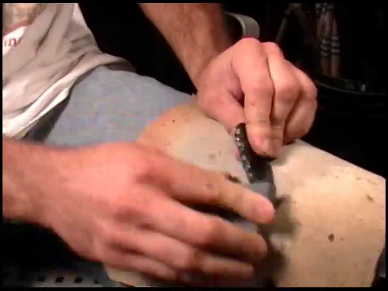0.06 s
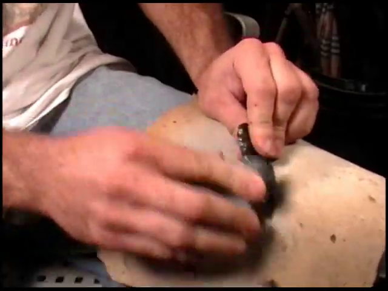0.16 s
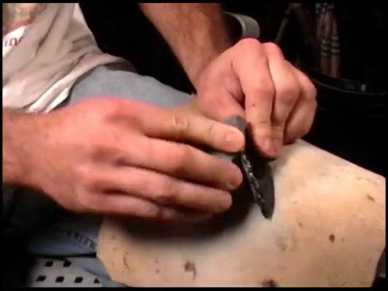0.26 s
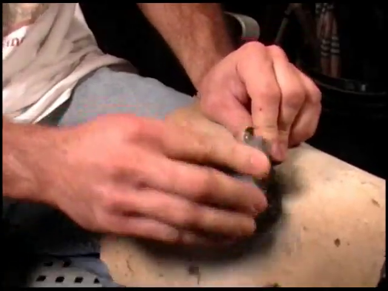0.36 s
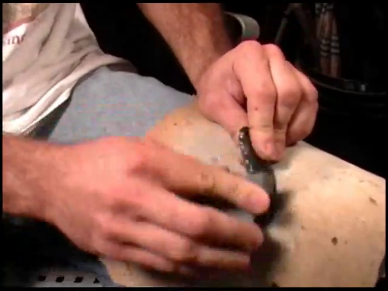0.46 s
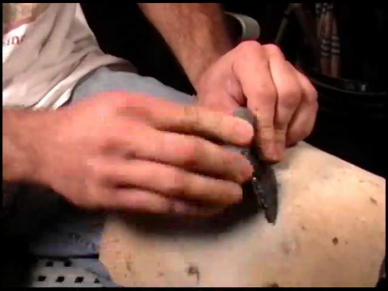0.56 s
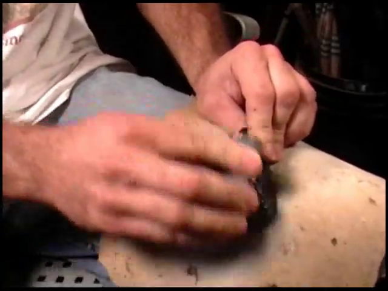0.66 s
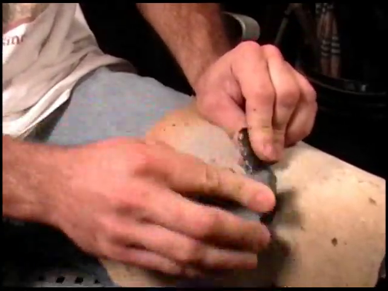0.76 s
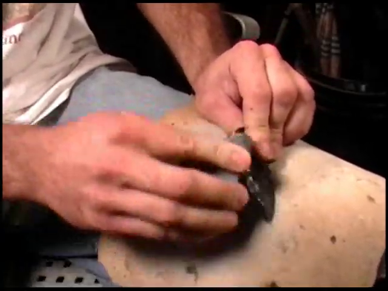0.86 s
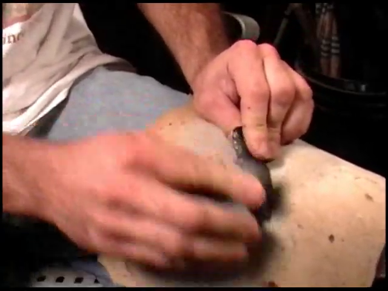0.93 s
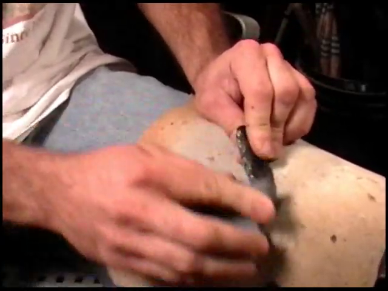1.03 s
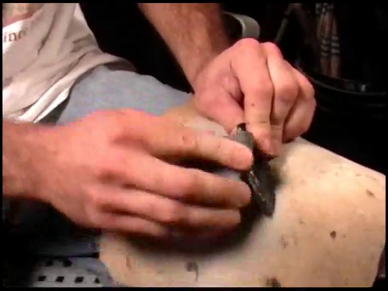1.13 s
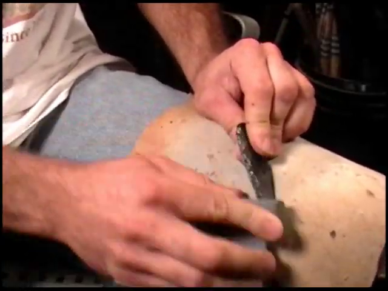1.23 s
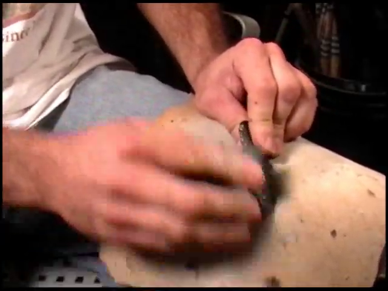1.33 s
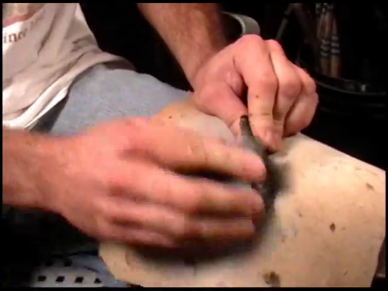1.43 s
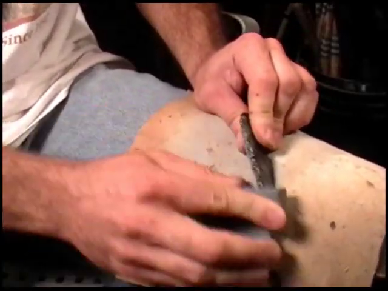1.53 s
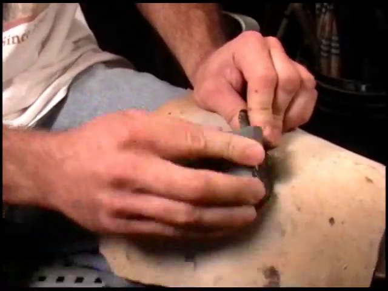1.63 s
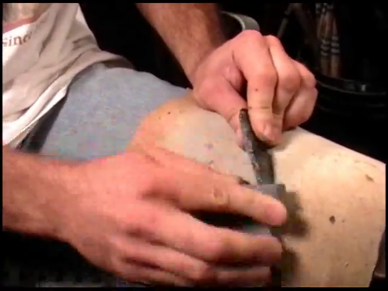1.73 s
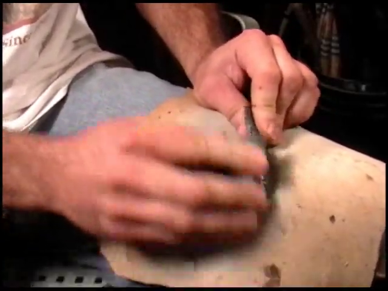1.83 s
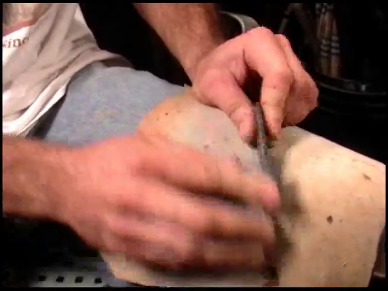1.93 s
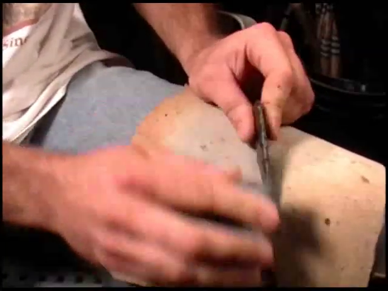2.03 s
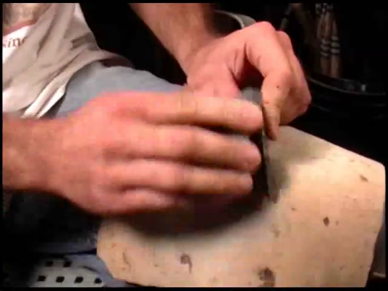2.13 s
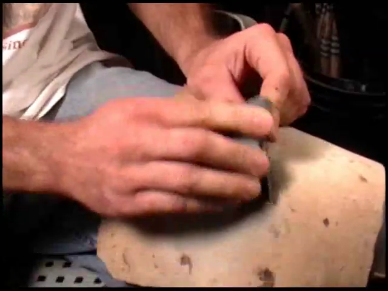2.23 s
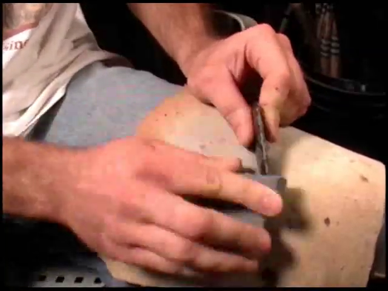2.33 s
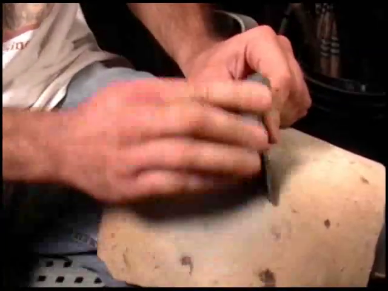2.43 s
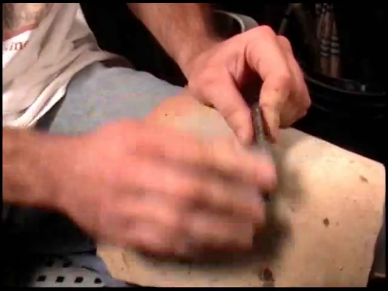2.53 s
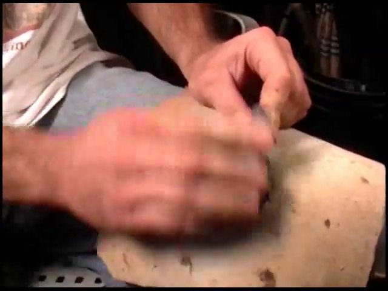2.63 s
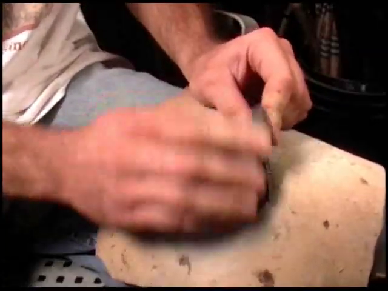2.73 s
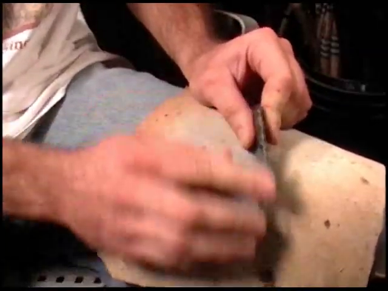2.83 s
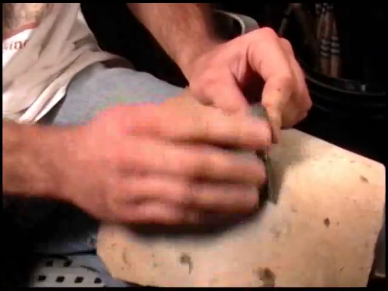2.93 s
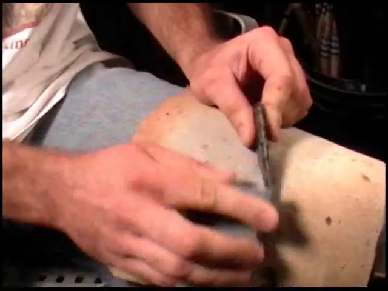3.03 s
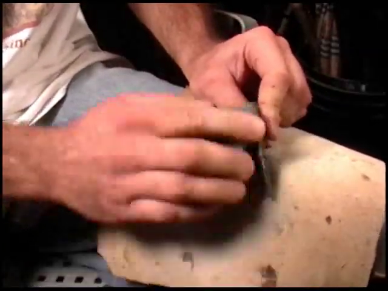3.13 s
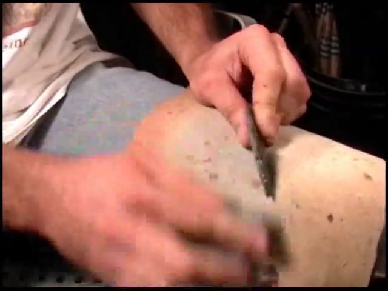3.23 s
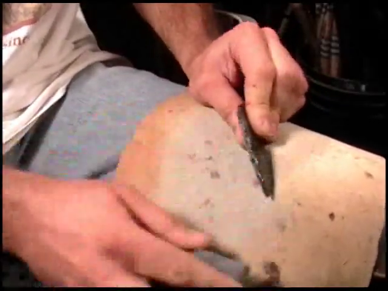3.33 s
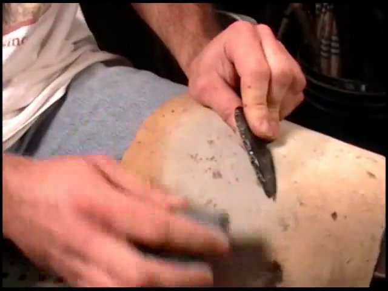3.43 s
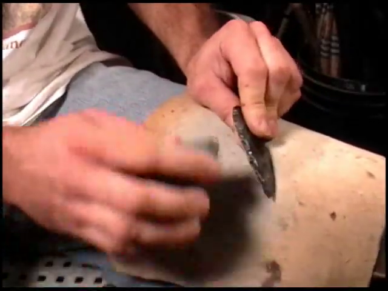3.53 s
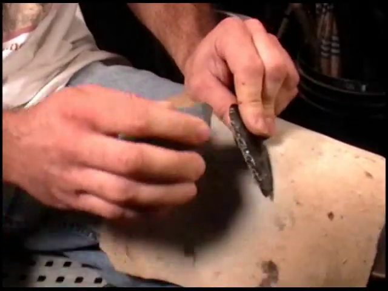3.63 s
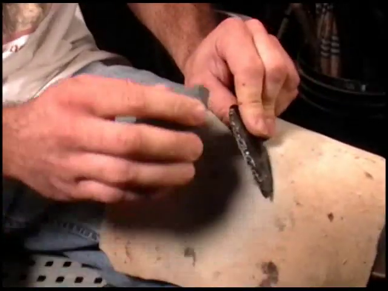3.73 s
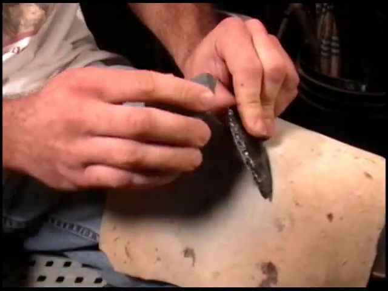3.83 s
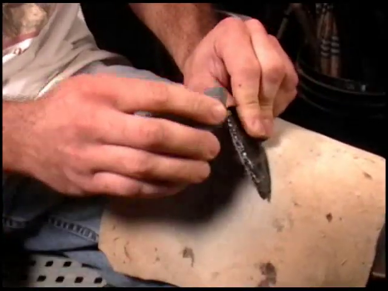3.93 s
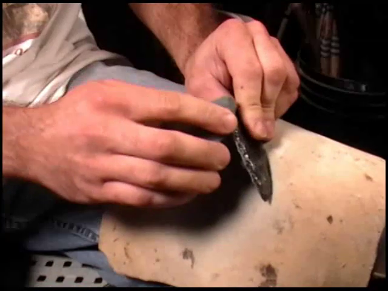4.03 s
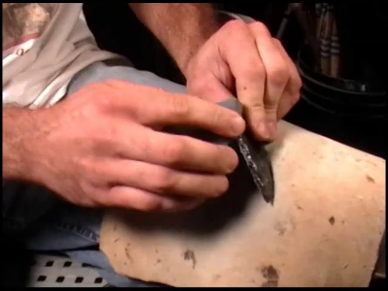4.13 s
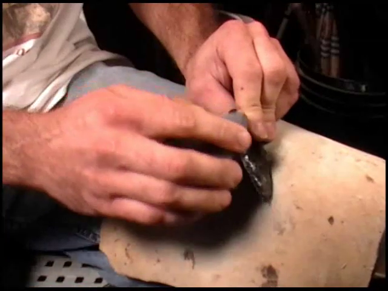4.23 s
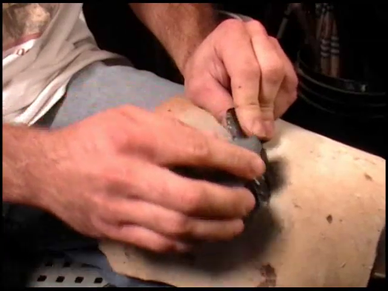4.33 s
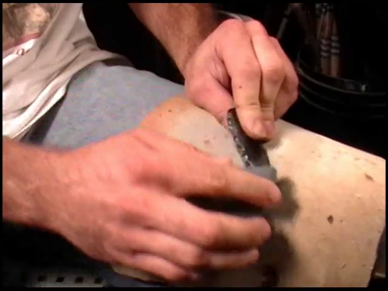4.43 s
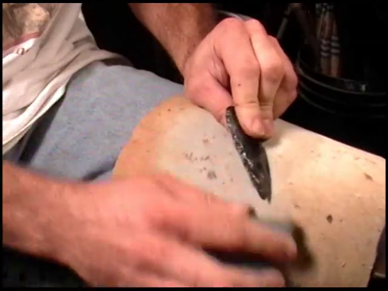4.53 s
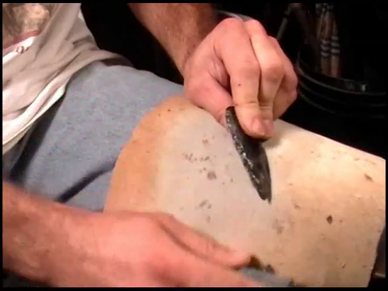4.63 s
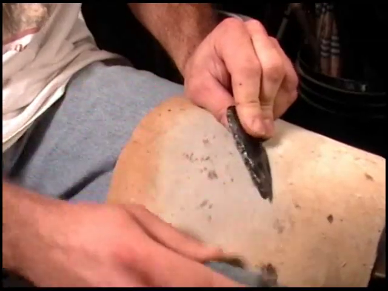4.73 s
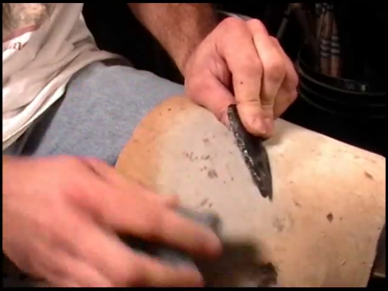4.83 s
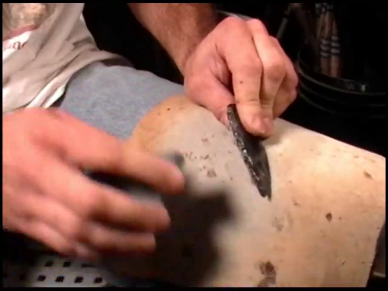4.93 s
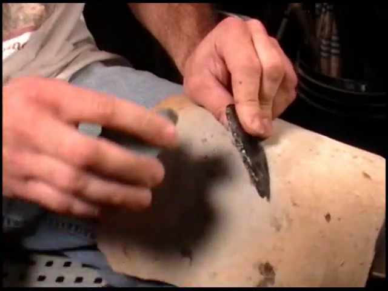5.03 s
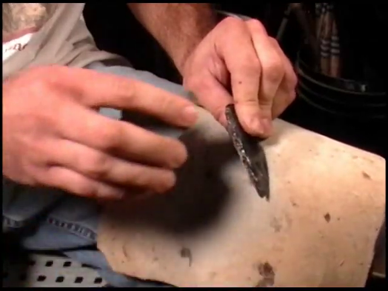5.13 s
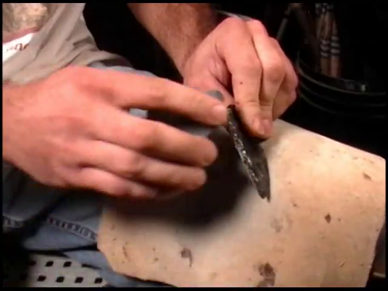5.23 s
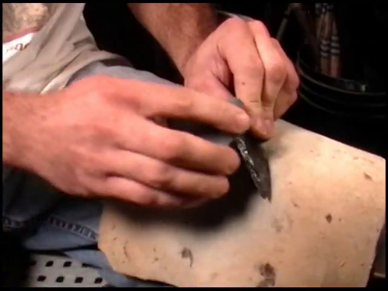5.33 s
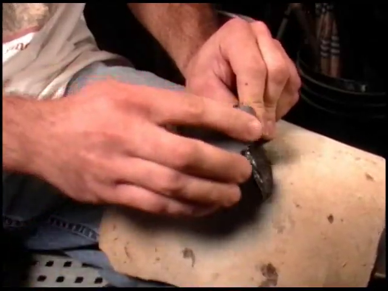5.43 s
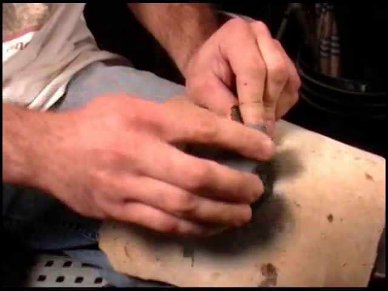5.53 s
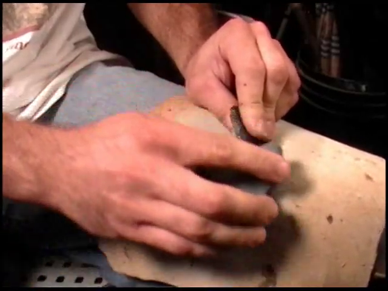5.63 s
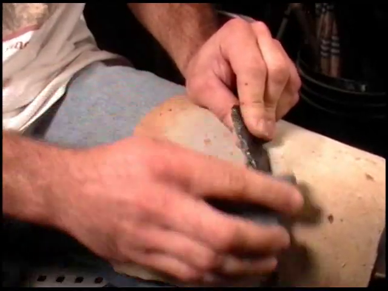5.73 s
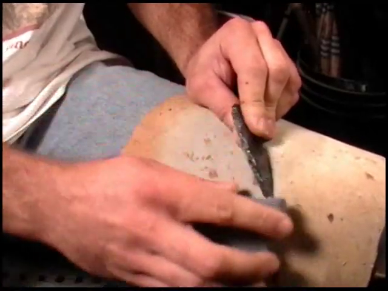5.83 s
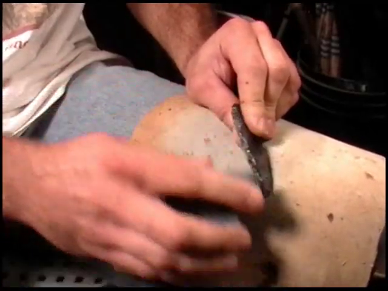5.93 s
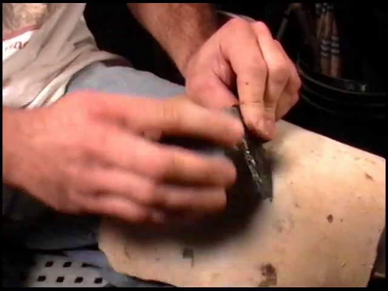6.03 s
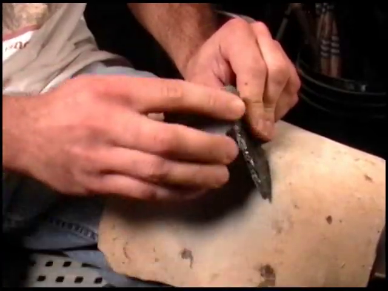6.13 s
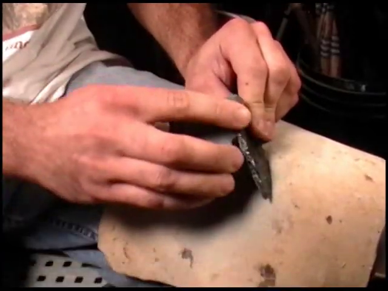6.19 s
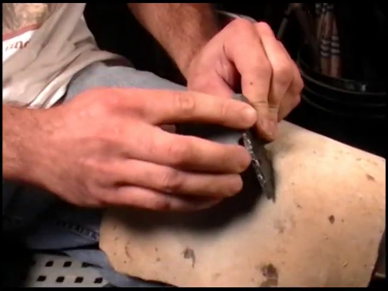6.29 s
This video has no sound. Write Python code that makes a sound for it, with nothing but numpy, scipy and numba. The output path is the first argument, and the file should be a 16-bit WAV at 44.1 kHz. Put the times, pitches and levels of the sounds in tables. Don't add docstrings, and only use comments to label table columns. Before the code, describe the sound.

An abrader stone is rubbed rapidly along a flint blade held on a leather pad, making harsh, bright, gritty scrapes for about two seconds. Five short separate swipes follow, each landing with a click. Then come light ticks and two softer, slower drags with pauses between. Close stereo camera microphone in a small room, with a low distant idling engine and traffic beneath.

```python
import sys
import numpy as np
from scipy import signal
from scipy.fft import rfft, irfft, next_fast_len
from scipy.io import wavfile
from scipy.ndimage import uniform_filter1d
from numba import njit

SR = 44100
rng = np.random.default_rng(int(sys.argv[2]) if len(sys.argv) > 2 else 0)


def ratio_of_db(decibels):
    return 10 ** (np.asarray(decibels, float) / 20)


def store_wav(level_fs):
    pcm = np.round(np.clip(np.atleast_2d(level_fs), -1, 1) * 32767)
    wavfile.write(sys.argv[1], SR, pcm.T.astype(np.int16))


N = 280476


def unit(x):
    return x / np.sqrt(np.mean(x ** 2))


@njit
def svf(x, hz, width):
    y, band, low = np.empty(len(x)), 0., 0.
    for i in range(len(x)):
        g = np.tan(np.pi * hz[i] / SR)
        damping = width[i] / hz[i]
        v = (band + g * (x[i] - low)) / (1 + g * (g + damping))
        band = 2 * v - band
        low = low + 2 * g * v
        y[i] = damping * v
    return y


def ring(force, hz, width):
    level = np.sqrt(SR / np.pi / width)
    return svf(force * level, hz + 0 * force, width + 0 * force)


def walk(rate_hz):
    hold = int(SR / rate_hz)
    steps = np.repeat(rng.standard_normal(N // hold + 1), hold)
    return 0.902 * uniform_filter1d(steps, hold)[:N]


def colour(x, points):
    size = next_fast_len(x.shape[-1])
    hz, db = np.transpose(points)
    bins_hz = np.arange(size // 2 + 1) * SR / size
    gain = ratio_of_db(np.interp(np.log(bins_hz + 1), np.log(hz), db))
    return irfft(rfft(x, size) * gain, size)[..., :x.shape[-1]]


# freq_hz, density_db (per Hz)
AIR_SPECTRUM = [(120, -29), (200, -1), (286, 3), (363, -3), (446, -4.5), (529, -8.5), (731, -12),
                (1030, -15.5), (1120, -16.5), (2290, -27.5), (2960, -32.5), (3640, -36.5), (11800, -46.5),
                (15300, -91), (22000, -120)]
# time_s, rumble_db, tenth_harmonic_db (engine load)
TRAFFIC_RUMBLE = [(0.0, -56, 3.5), (0.62, -40, 3), (1.35, -51.5, 1), (2.11, -43.5, 9), (2.7, -41, 9),
                  (3.2, -49.5, 3.5), (3.4, -39.5, -5), (3.93, -40, -6.5), (4.1, -49, -3), (5.2, -45, 5.5),
                  (6.1, -43.5, 6), (6.36, -43.5, 5)]
# time_s, level_db
TYRE_HISS = [(0.0, -38.5), (2.1, -38), (3.3, -40), (3.5, -37), (3.8, -37), (4.6, -40), (4.9, -36),
             (5.2, -40), (5.85, -37), (6.05, -34), (6.36, -34.5)]


def traffic(rumble_db):
    t = np.arange(N) / SR
    hiss_db = np.interp(t, *np.transpose(TYRE_HISS)) - rumble_db + 2.2 * walk(4.33)
    mid, side = colour(rng.standard_normal((2, N)), AIR_SPECTRUM)
    side = colour(side, [(200, -14), (400, -17.5), (800, -9.5), (12000, -3.5)])
    air = (mid + side * np.array([[1], [-1]])) / np.std(mid)
    hiss = colour(air, [(400, -28.5), (700, 0.5), (3200, 6.0), (7000, -5.), (12000, -7.5)])
    return ratio_of_db(rumble_db) * (air + hiss * (ratio_of_db(hiss_db) - 1))


# firing_rate_multiple, level_db
ENGINE_HARMONICS = [(1, -23.5), (2, -21.5), (3, -9), (4, -2.5), (5, -30.5), (6, 6), (7, 1.5), (8, -1.5),
                    (9, -2.5), (10, -1.5), (11, -0.5), (12, -2.5), (13, -18.5), (14, -1), (15, -3),
                    (16, -4.5), (17, -11.5), (18, 0.5), (19, -16), (20, -8), (21, -17), (22, -4.5),
                    (23, -13), (24, -26.5)]


def engine(tenth_db):
    firing_hz = 19.5 * (1 + 0.00581 * walk(1.5))
    turn = 2 * np.pi * np.cumsum(firing_hz) / SR
    drone = np.zeros(N)
    for k, db in ENGINE_HARMONICS:
        level_db = db + 3.9 * walk(7.) + 1.2 * walk(1.72) + tenth_db * (k == 10)
        phase = k * turn + 1.0 * walk(2.99) + k * k
        drone += ratio_of_db(level_db) * np.sin(phase)
    drone = unit(ratio_of_db(2. * walk(3.8)) * drone)
    return ratio_of_db(-43.5) * drone * ratio_of_db(np.array([[.6], [-.6]]))


def outdoors():
    t = np.arange(N) / SR
    time_s, *columns = np.transpose(TRAFFIC_RUMBLE)
    rumble_db, tenth_db = (np.interp(t, time_s, column) for column in columns)
    ground = colour(rng.standard_normal((2, N)), [(20, -29), (50, -25), (80, 17.0), (200, 3.5), (300, -46.5)])
    ground = ratio_of_db(-57) * unit(ground + .8 * ground[0])
    return traffic(rumble_db) + ground + engine(tenth_db)


def grit(spread_db, teeth_db, patchy_db):
    sizes = ratio_of_db(spread_db * np.minimum(rng.exponential(size=(4, N)), 9))
    patches_db = patchy_db * np.array([walk(40.) for _ in range(4)])
    bunching_db = np.clip(teeth_db * walk(260.), -9, 5) + patches_db
    return unit(rng.standard_normal((4, N)) * sizes * ratio_of_db(bunching_db))


# start_s, length_s, blade_db, abrader_over_blade_db,
# lean_db (blade swells as the abrader ring fades)
RUBS = [(-0.04, 0.12, -17.5, -0.5, 2.5), (0.11, 0.17, -24, 8.5, -4), (0.315, 0.15, -20, -6, -10),
        (0.455, 0.12, -25, 4.5, 3.5), (0.588, 0.17, -20, -7, -3.5), (0.762, 0.12, -24.5, 3.5, -3.5),
        (0.871, 0.12, -20.5, 2, 18), (1.008, 0.13, -23.5, 5.5, -12), (1.14, 0.12, -18.5, -0.5, 6),
        (1.256, 0.14, -20, 3.5, 0.5), (1.396, 0.132, -16.5, -3, -2), (1.522, 0.12, -23, 0, 9),
        (1.641, 0.11, -19, -2, 4), (1.757, 0.124, -19.5, 1, 1.5), (1.884, 0.068, -18.5, 2.5, 1.5)]
SWIPES = [
    (2.213, 0.12, -19, 1, -5),
    (2.465, 0.091, -20, 0.5, -5),
    (2.7, 0.091, -19.5, 2.5, -9),
    (2.922, 0.083, -19.5, 5.5, -5),
    (3.147, 0.089, -20.5, 6, -5.5),
    (4.0, 0.15, -45, 2, 7),
    (5.323, 0.049, -39, -6, -10),
    (6.182, 0.06, -40, -1, -1),
    (6.32, 0.043, -35.5, -9, -25),
]
# time_s, blade_db (pressure), abrader_over_blade_db
DRAGS = [
    [(4.166, -32, -7), (4.176, -29, -10), (4.235, -30.5, 2.5), (4.28, -26.5, 0), (4.39, -23, -11.5),
     (4.45, -24, -8.5), (4.495, -28.5, 8), (4.525, -58, 15.5)],
    [(5.374, -30.5, -27), (5.4, -32, -7), (5.45, -30, -21), (5.53, -26, -4), (5.56, -29, -0.5),
     (5.63, -28.5, -2), (5.68, -28, -13.5), (5.775, -32.5, 9), (5.81, -46, -2)],
]


def hand(t):
    attack_s, release_s = 0.013, 0.012
    out = np.zeros((4, N))
    for start, length, db, ring_db, lean_db in RUBS + SWIPES:
        on = (t >= start) & (t < start + length)
        since_s, left_s = t[on] - start, start + length - t[on]
        along = since_s / length - .5
        speed = np.cos(np.pi * along)
        db = db + 20 * np.log10(np.clip(np.minimum(since_s / attack_s, left_s / release_s), 1e-3, 1))
        out[0, on] = ratio_of_db(db + lean_db * along) * speed ** 0.52
        out[1, on] = ratio_of_db(db + ring_db - 0.95 * lean_db * along) * speed
        out[2, on] = 8.5 * along
        out[3, on] = 14.5 * lean_db * along
    for drag in DRAGS:
        time_s, db, ring_db = np.transpose(drag)
        on = (t >= time_s[0]) & (t < time_s[-1])
        out[0, on] = np.interp(t[on], time_s, ratio_of_db(db))
        out[1, on] = out[0, on] * ratio_of_db(np.interp(t[on], time_s, ring_db))
    return uniform_filter1d(out, size=130)


# start_s, peak_db, crumble_ms, blow_db
CATCHES = [(0.2879, -9.5, 3, 0), (0.3032, -1.5, 0.91, -17), (0.335, -1.5, 1.5, -19),
           (0.6612, -19, 1.68, 13), (1.1503, -10, 1.93, 5), (1.406, -10.5, 1.4, 0), (1.7718, -10, 1.2, 3),
           (4.0081, -15.5, 2.4, -9), (4.042, -14, 1.7, 0), (4.0736, -9.5, 1.26, 2), (4.0884, -13.5, 4, -18),
           (4.1132, -17, 1.2, 13), (4.1391, -20, 1.7, 16), (4.1743, -14, 2.3, 8), (4.1894, -8.5, 2.1, -19),
           (4.3984, -7, 2.3, 3), (5.3299, -11, 0.66, -1), (5.3444, -30, 1.5, -8.0), (5.3787, -23, 0.88, 19),
           (5.421, -5, 0.46, -17), (5.4635, -18.5, 0.88, 15), (6.2036, -18, 1, -5),
           (6.2248, -16.5, 0.87, -3), (6.294, -36, 1.4, -8.0), (6.3245, -11.5, 0.77, -3)]
LANDINGS = [
    (2.2093, -9.5, 2, 11),
    (2.4672, -9.5, 1.6, -17),
    (2.6915, -1.5, 0.58, -1),
    (2.921, 0.5, 0.37, 4),
    (3.1426, -2, 0.72, 10.5),
    (3.983, -12.5, 0.69, 2),
    (5.3198, -7, 0.61, -1.5),
    (6.1819, -11.5, 0.75, 4.5),
]


def catches():
    brisk_until_s = 2.
    second_tap_db, edge_tap_db, rasp_tap_db = -9.5, -8, -19.5
    events = LANDINGS + CATCHES
    force = np.zeros((5, N))
    ms = np.arange(1300) / SR * 1000
    crumbs = rng.standard_normal((len(events), 1305))
    for (start_s, db, crumble_ms, blow_db), crumb in zip(events, crumbs):
        i = int(start_s * SR)
        age = ms / max(crumble_ms, .2)
        push = 0.21 * crumb[:1300] * age * np.exp(1 - age)
        push[:3] -= ratio_of_db(blow_db - 7.5) * np.hanning(5)[1:4]
        ring_db = 1 if start_s < brisk_until_s else -5.5
        share_db = np.array([0, ring_db, second_tap_db, edge_tap_db, rasp_tap_db])
        share_db = share_db + 2.5 * np.tanh(crumb[1300:])
        force[:, i:i + 1300] += (push * ratio_of_db(db + share_db[:, None]))[:, :N - i]
    return force


# from_s, bending_hz, bending_width_hz, second_mode_hz, second_mode_db
GRIPS = [(0, 2100, 485, 3260, -6), (0.28, 2216, 400, 3540, -8.5), (0.46, 2130, 474, 3500, -11),
         (1.14, 2230, 525, 3550, -11.5), (2.1, 2380, 380, 4000, -8), (2.42, 2415, 418.6, 4000, -5),
         (2.62, 2400, 420, 4010, -4.5), (3.08, 2270, 422, 4020, -4.5), (3.6, 2155, 223, 3570, -6.5),
         (4.44, 2300, 406, 3690, -8.5), (5.0, 2120, 254, 3520, -11.5), (5.66, 2440, 800, 3300, -4.5),
         (6.0, 2200, 329, 3600, -26)]
# abrader_hz, abrader_width_hz, rasp_db, edge_ring_db, pad_thump_db
SEATS = [(6940, 470, -10, -10, -14), (7050, 450, -13, -6.5, -10.5), (6923, 330, -11, -11.5, -15),
         (6870, 450, -12, -14, -12), (6910, 480, -13, -14, -8.5), (6870, 560, -12, -3.5, -9.5),
         (6970, 450, -11.5, -9, -9.5), (6910, 640, -15, -2.5, -9.5), (7030, 460, -16.5, -6, -10.5),
         (7040, 880, -21.5, -1.5, -7.5), (7010, 220, -16.5, -4.5, -7), (7090, 250, -12, -12.5, -5.5),
         (6840, 400, -20, -8.5, -4.5)]


def stones():
    t = np.arange(N) / SR
    wander, wander_db = 0.018, 2.5
    pressure, drive, load_db, shift_hz = hand(t)
    held = np.searchsorted(np.array(GRIPS)[:, 0], t, side="right") - 1
    grip = uniform_filter1d(np.hstack([GRIPS, SEATS])[held].T, size=1500)
    _, bend_hz, bend_width, second_hz, second_db, abrader_hz, width, rasp_db, edge_db, pad_db = grip
    bend_hz = (bend_hz + shift_hz) * (1 + wander * walk(16.))

    forces = grit(spread_db=2.6, teeth_db=2.0, patchy_db=2.18)
    rub, grind, nick, scuff = forces * np.array([pressure, drive, pressure, pressure])
    tap, tap_ring, tap_second, tap_edge, tap_rasp = catches()
    favour = (drive + 1e-6) / (pressure + 1e-6)

    blade = svf(ring(rub, bend_hz, bend_width), bend_hz, 5.04 * bend_width)
    blade += ring(tap, bend_hz, 1.1 * bend_width)
    blade += ring(tap * ratio_of_db(-14.5), 2700, 4400)
    second_level_db = second_db - load_db + wander_db * walk(12.)
    second_force = nick * ratio_of_db(second_level_db) + tap_second
    blade += ring(second_force, second_hz * (1 + wander * walk(6.1)), 0.87 * bend_width)

    abrader = ring(grind + tap_ring, abrader_hz * (1 + wander * walk(14.0)), width)
    abrader = svf(abrader, abrader_hz, 6.6 * width)

    edge_force = nick * favour ** 0.4 * ratio_of_db(edge_db + wander_db * walk(22.09)) + tap_edge
    edge = ring(edge_force, 11050, 1.53 * width)

    pad_force = scuff * ratio_of_db(pad_db + load_db + wander_db * walk(9.1)) + tap * ratio_of_db(-51.5)
    pad = ring(pad_force, 1340, 790)

    rasp_force = scuff * favour ** 0.38 * ratio_of_db(rasp_db + wander_db * walk(15.0)) + tap_rasp
    rasp = colour(rasp_force, [(300, -37.5), (900, -27.0), (3000, 2.5), (5500, 9.5), (9500, 5.5), (12000, 10.0)])
    return blade - abrader + edge + pad + rasp


# freq_hz, left_minus_right_db, left_lead_rad
PORTS = [(300, 1.5, 0.0), (1100, -0.5, -0.2), (2300, -3, -0.49), (4000, -4, 0.0), (6800, -3, 0.21),
         (7670, -0.5, 0.0), (10430, 1, 0.0), (11800, -3, -0.51)]


def ports(x):
    hz, db, lead = np.transpose(PORTS)
    bins_hz = np.arange(N // 2 + 1) * SR / N
    log_ratio = db * np.log(10) / 20 + 1j * lead
    half = np.interp(np.log(bins_hz + 1), np.log(hz), log_ratio) / 2
    return irfft(rfft(x) * np.exp([half, -half]), N)


# band_hz, t60_s
ROOM_DECAY = [(1000, 0.46), (2000, 0.26), (3200, 0.32), (4800, 0.3), (7000, 0.21), (9200, 0.028),
              (11300, 0.18)]


def room(x):
    t = np.arange(SR // 2) / SR
    tails = np.zeros((2, len(t)))
    for hz, t60 in ROOM_DECAY:
        decay = ratio_of_db(-60 * t / t60) * (t > .003)
        for tail in range(2):
            band = ring(rng.standard_normal(len(t)), hz, hz / 2)
            band = ring(band, hz, hz / 2)
            tails[tail] += unit(band) * np.sqrt(hz / 4000) * decay
    shared = tails.mean(axis=0)
    tails = unit(shared + 0.43 * (tails - shared)) / np.sqrt(len(t))
    return ratio_of_db(-12.5) * signal.fftconvolve(x[None], tails, axes=1)[:, :N]


def sleeve():
    t = np.arange(N) / SR
    swing = np.exp(-((t - 4.78) / 0.054) ** 2)
    return ratio_of_db(-59.5) * swing * ring(rng.standard_normal(N), 5100.0, 7500.0)


def scene():
    rubbing = stones()
    return ports(rubbing) + room(rubbing) + outdoors() + sleeve()


def band_limit(x):
    return signal.sosfilt(signal.butter(12, 13220, fs=SR, output="sos"), x)


def record(dry):
    rounded = np.tanh(dry / 1.08) * 1.08
    top_cut = signal.ellip(10, .2, 70, 11800, fs=SR, output="sos")
    mix = signal.sosfilt(top_cut, rounded)
    return band_limit(mix)


dry = scene()
out = record(dry)
store_wav(out)
```